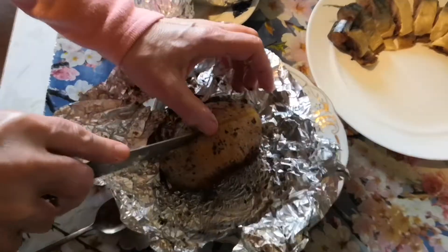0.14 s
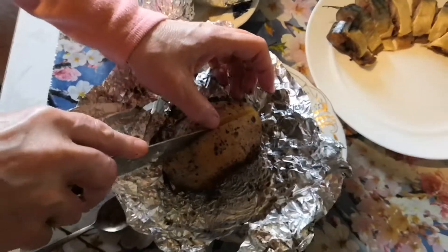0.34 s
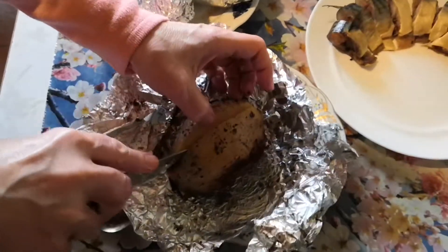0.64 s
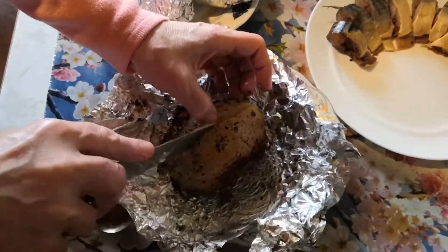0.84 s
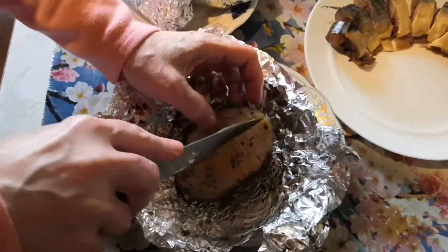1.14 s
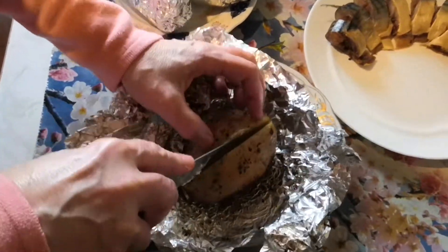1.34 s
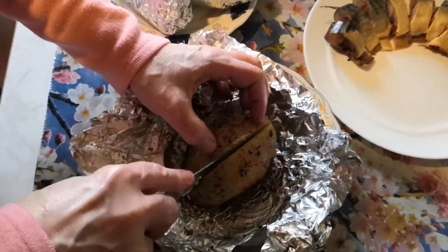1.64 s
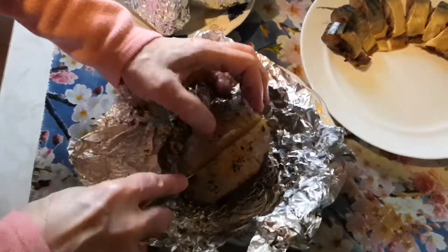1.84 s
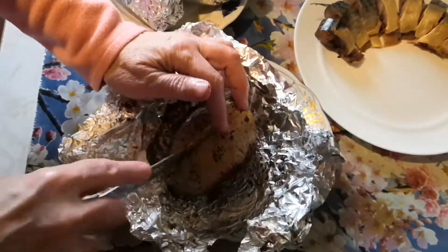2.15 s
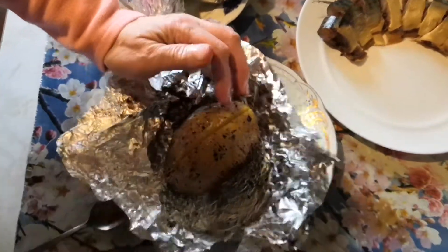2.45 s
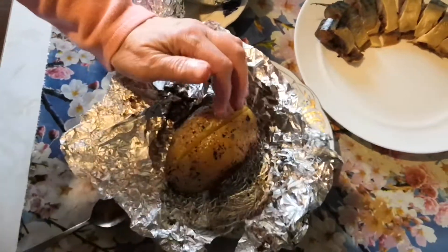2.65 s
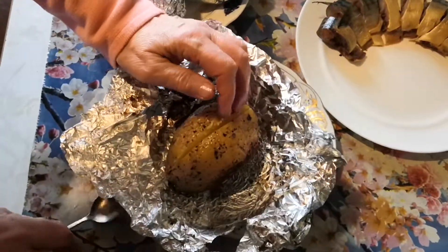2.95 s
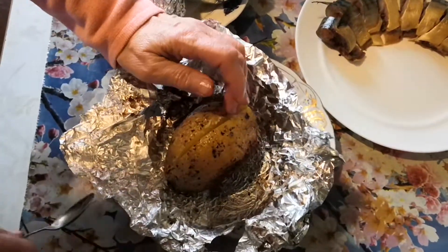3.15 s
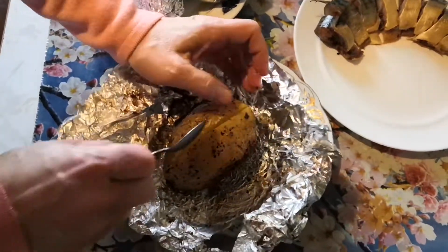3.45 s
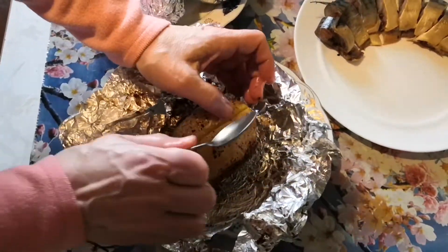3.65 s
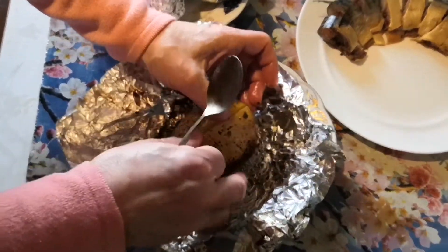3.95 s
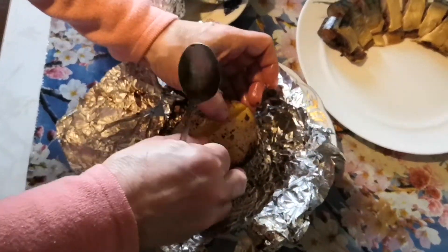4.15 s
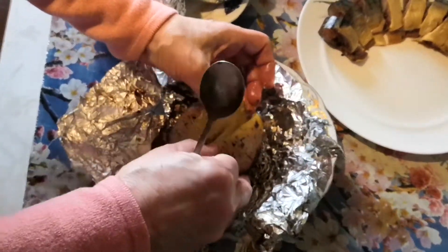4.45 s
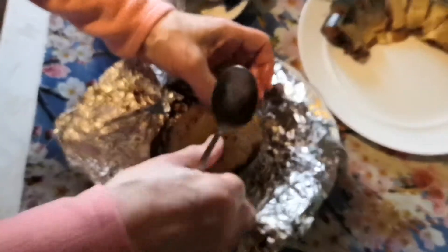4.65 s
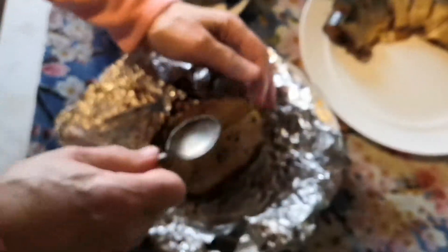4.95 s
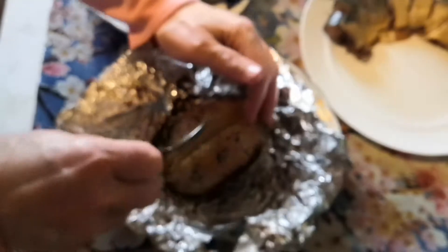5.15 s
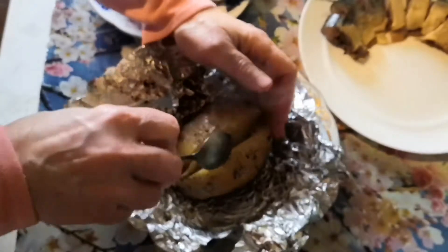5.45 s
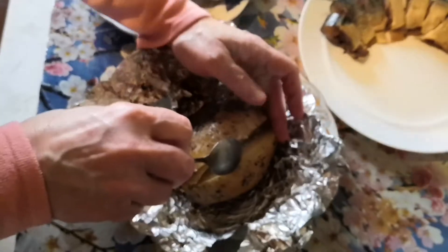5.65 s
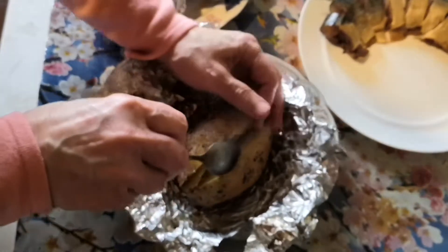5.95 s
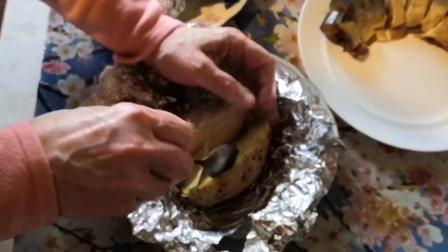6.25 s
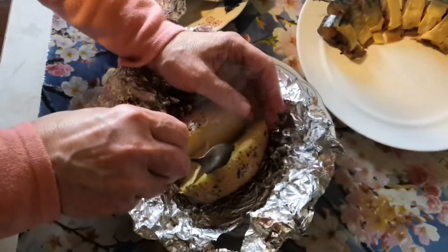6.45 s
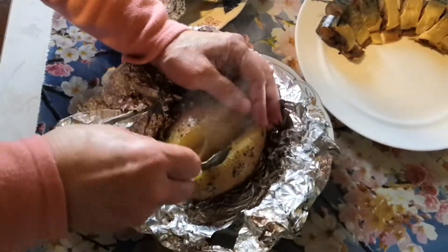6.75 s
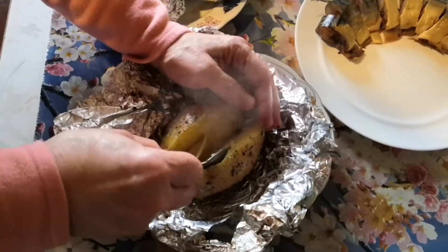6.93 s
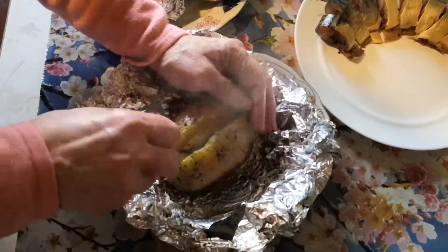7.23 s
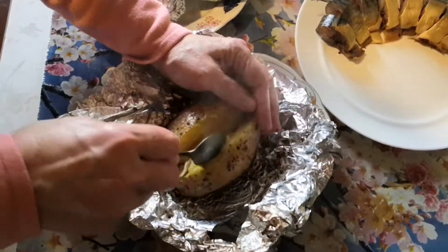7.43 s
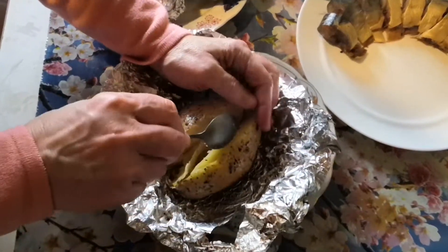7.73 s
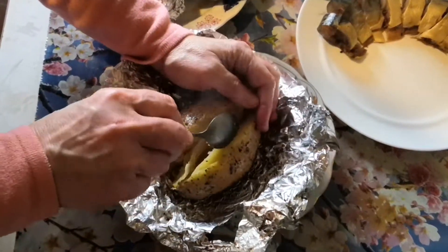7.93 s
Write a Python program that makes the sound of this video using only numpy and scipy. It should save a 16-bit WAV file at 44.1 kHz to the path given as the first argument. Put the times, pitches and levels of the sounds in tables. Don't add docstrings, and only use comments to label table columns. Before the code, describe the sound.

Close, crisp foil rustling with bright ticks and small tinny pops, interrupted by one loud cutlery clatter, over a faint low fridge hum.

```python
import sys
import numpy as np
from scipy import signal
from scipy.fft import rfft, irfft, next_fast_len
from scipy.io import wavfile
from scipy.ndimage import uniform_filter1d, minimum_filter1d, map_coordinates

SR = 44100
rng = np.random.default_rng(int(sys.argv[2]) if len(sys.argv) > 2 else 0)


def decibels_to_gain(level_db):
    exponent = np.asarray(level_db, float) / 20
    return 10 ** exponent


def log_audio(samples):
    frames = np.atleast_2d(samples).T
    limited = np.clip(frames, -1, 1)
    pcm = np.round(limited * 32767).astype(np.int16)
    wavfile.write(sys.argv[1], SR, pcm)


N = 356769

# pitch_hz [Hz], level_db [dB per Hz]
CREASE_COLOUR = [(1760, -17), (3000, -6.5), (4170, -5.5), (4700, -3.5), (6530, -5.5), (7720, -6),
                 (14500, -29), (15400, -23.5), (16000, -68)]


def unit(x):
    return x / np.sqrt(np.mean(x ** 2) + 1e-20)


def along(points, hz):
    f, v = np.transpose(points)
    return np.interp(np.log(hz + 1), np.log(f + 1), v)


def wobble(rate):
    knots = rng.standard_normal(int(N * rate / SR) + 4)
    return map_coordinates(knots, [np.arange(N) * rate / SR])


def filtered(x, response):
    m = next_fast_len(N + SR // 2)
    return irfft(rfft(x, m) * response(np.fft.rfftfreq(m, 1 / SR)), m)[..., :N]


def resonances(modes):
    def response(f):
        total = 0
        for k, (hz, width, db) in enumerate(modes):
            total = total + (-1) ** k * decibels_to_gain(db) * 1j * f * width / (hz * hz - f * f + 1j * f * width)
        return total
    return response


def laid_out(s, shapes):
    at = (np.round(s * SR).astype(int)[:, None] + np.arange(shapes.shape[2])).ravel()
    return np.array([np.bincount(at, side.ravel(), N + SR)[:N] for side in shapes])


def clangs(s, db, hz, width_hz, rise, t60, alike, size):
    port_lag_s = .00011
    t = np.arange(size) / SR
    step = t * width_hz
    whole, part = step.astype(int), step % 1
    draw = rng.standard_normal((len(s), 4, int(size / SR * 4000) + 2))
    shared = draw[:, 0] + 1j * draw[:, 1]
    own = draw[:, 2] + 1j * draw[:, 3]
    shared[:, 0] *= 2 / np.abs(shared[:, 0])
    late = shared * np.exp(-2j * np.pi * hz[:, None] * port_lag_s)
    knots = np.array([shared, alike * late + np.sqrt(1 - alike ** 2) * own])
    wander = knots[..., whole] * (1 - part) + knots[..., whole + 1] * part
    envelope = decibels_to_gain(-60 * (t / t60) ** 1.42) * (1 - np.exp(-t / rise))
    ring = (wander * np.exp(2j * np.pi * hz[:, None] * t)).real * envelope
    left_peak = np.abs(ring[0]).max(1)[:, None]
    return laid_out(s, decibels_to_gain(db)[:, None] * ring / left_peak)


def ticks(s, db, t60, size, rise=.0003):
    t = np.arange(size) / SR
    burst = np.moveaxis(rng.standard_normal((len(s), 2, size)), 1, 0)
    return laid_out(s, decibels_to_gain(db)[:, None] * burst * decibels_to_gain(-60 * t / t60) * (1 - np.exp(-t / rise)))


def still_air():
    # pitch_hz [Hz], level_db [dB per Hz]
    air = [(12, -39), (20, -7), (56, -3), (96, -6.5), (150, 4.5), (193, -4), (248, -1), (660, -21.5),
           (923, -17.5), (1370, -23), (1710, -8.5), (2460, -32), (3340, -38), (7730, -45), (14700, -58),
           (16000, -65)]
    # pitch_hz [Hz], likeness [0 to 1]
    likeness = [(60, 0.88), (950, .06)]

    def mid_and_side(hz):
        turn = np.arccos(np.clip(along(likeness, hz), -1, 1)) / 2
        return decibels_to_gain(along(air, hz)) * [np.cos(turn), np.sin(turn)]
    mid, side = filtered(rng.standard_normal((2, N)), mid_and_side)
    return decibels_to_gain(-61.5) * unit(np.array([mid + side, mid - side]))


def fridge():
    # pitch_hz [Hz], level_db [dB rms]
    lines = [
        (49, -66),
        (195.8, -65),
        (393.0, -80),
    ]
    t = np.arange(N) / SR
    hum = np.zeros(N)
    for hz, db in lines:
        level = np.sqrt(2) * decibels_to_gain(db + 1.2 * wobble(11))
        hum += level * np.sin(2 * np.pi * hz * t + .5 * wobble(3.4))
    return hum


def kitchen(x):
    # pitch_hz [Hz], t60_s [s]
    decay = [(200, 0.94), (2000, 0.18), (10000, 0.13)]
    hz, t, z = signal.stft(rng.standard_normal((2, SR // 2)), SR, nperseg=256)
    tail = signal.istft(z * decibels_to_gain(-60 * t / along(decay, hz)[:, None]), SR, nperseg=256)[1]
    delayed = np.pad(x.mean(0), (200, 0))[None]
    return signal.fftconvolve(delayed, tail / np.linalg.norm(tail[0]), axes=1)[:, :N]


def table_thumps():
    # start_s [s], level_db [dB peak], pitch_hz [Hz], t60_s [s]
    thumps = [
        (1.74, -39.5, 66.5, 0.4),
        (1.792, -38, 71.4, 0.17),
        (2.538, -37.5, 126.5, 0.27),
        (2.578, -37, 106, 0.24),
        (2.706, -28.5, 74.5, 0.084),
        (2.718, -34.5, 133.2, 0.52),
        (2.889, -33.5, 157, 0.065),
        (4.347, -40, 119, 0.25),
        (6.118, -46.5, 147.4, 0.34),
        (7.289, -56, 148.7, 0.88),
    ]
    t = np.arange(SR // 2) / SR
    s, db, hz, t60 = np.transpose(thumps)[..., None]
    boom = np.sin(2 * np.pi * hz * t)
    boom = boom + 0.14 * np.sin(2 * np.pi * 2.5 * hz * t) + 0.72 * np.sin(2 * np.pi * 0.65 * hz * t)
    boom = decibels_to_gain(db - 60 * t / t60) * (1 - np.exp(-t / 0.00494)) * boom
    return filtered(laid_out(s[:, 0], np.array([boom, boom])), lambda f: (1j * f / (45 + 1j * f)) ** 2)


def knife_landing():
    # start_s [s], level_db [dB peak]
    landings = [
        (2.535, -16.5),
        (2.578, -13),
        (2.7049, -1),
        (2.71, -10),
        (2.7161, 5),
        (2.7205, -3),
        (2.728, -15.5),
    ]
    # pitch_hz [Hz], width_hz [Hz], level_db [dB]
    table_modes = [(259, 31, -9.5), (355, 15, -11.5), (404, 25, -8.5), (730, 350, -15.5), (860, 120, -8.5),
                   (1236, 150, -5.5), (1604, 490, -6.5), (2000, 170, -1), (2280, 210, -3.5),
                   (2690, 140, 1.5), (4170, 220, -13), (5940, 500, -10.5), (7540, 1300, -16)]
    s, db = np.transpose(landings)
    chatter_s = np.array([0, .0015, .0025])
    times = (s[:, None] + chatter_s).ravel()
    rattle = ticks(times, np.repeat(db + 14.0, len(chatter_s)), t60=0.0081, size=1000, rise=0.0013)
    wood = resonances(table_modes)
    return filtered(rattle, lambda f: wood(f) / (1 + 1j * f / 6000) ** 4)


def spoon():
    # pitch_hz [Hz], width_hz [Hz], level_db [dB]
    spoon_modes = [
        (910, 96, -7.5),
        (1780, 97.7, -5),
        (2450, 130, 1),
        (2760, 146, 6.5),
        (4250, 346, -5),
    ]
    # start_s [s], level_db [dB]
    drag = [
        (2.955, -57),
        (2.968, -46),
        (3.012, -40),
        (3.026, -51),
        (3.055, -46.5),
        (3.085, -69),
    ]
    # start_s [s], level_db [dB]
    lift = [
        (3.03, -65),
        (3.06, -49.5),
        (3.105, -90),
    ]
    # start_s [s], level_db [dB peak]
    catches = [
        (2.9642, -39.5),
        (2.9785, -30),
        (2.9895, -32),
        (2.9996, -24),
        (3.0075, -35),
        (3.039, -33),
        (3.0493, -44),
        (3.0554, -32),
    ]
    s, db = np.transpose(catches)
    sound = filtered(ticks(s, db + 21, t60=0.0066, size=600, rise=0.00044), resonances(spoon_modes))
    for stroke, modes in ((drag, spoon_modes), (lift, [(1200, 98, 0)])):
        knots, db = np.transpose(stroke)
        slips = rng.standard_normal((2, N)) * decibels_to_gain(1.5 * wobble(130))
        level = decibels_to_gain(np.interp(np.arange(N) / SR, knots, db + 5.0, left=-120, right=-120))
        sound = sound + level * unit(filtered(slips, resonances(modes)))
    return sound


def rubs():
    # start_s [s], length_s [s], level_db [dB], pitch_hz [Hz],
    # width_hz [Hz]
    slides = [(0.152, 0.071, -58, 2800, 120), (1.925, 0.14, -63, 3580, 110), (2.974, 0.057, -42.5, 952, 90),
              (3.213, 0.23, -58, 2650, 327), (3.314, 0.11, -49.5, 7450, 900),
              (3.424, 0.031, -42.5, 1555, 220), (3.51, 0.031, -46, 2000, 150),
              (3.616, 0.094, -54, 1710, 100), (7.308, 0.054, -66, 665, 100), (6.458, 0.085, -61, 1040, 500),
              (5.089, 0.021, -39, 2516, 74), (7.866, 0.11, -58, 5700, 640), (3.137, .014, -49, 1800, 150),
              (3.138, .016, -48.5, 2360, 150), (3.166, 0.024, -46, 2410, 150),
              (3.164, 0.023, -48.5, 1725, 150), (5.849, .11, -58, 2700, 130), (5.895, 0.15, -50, 1773, 115),
              (6.04, 0.098, -47, 2450, 200), (6.085, 0.15, -48.5, 1728, 120), (6.199, 0.12, -57, 1685, 170),
              (6.197, 0.088, -63, 2350, 150), (6.356, 0.11, -61.5, 1625, 130)]
    sound = np.zeros((2, N))
    for s, length, db, hz, width in slides:
        size, start = int(length * SR), int(s * SR)
        f = np.fft.rfftfreq(size, 1 / SR)
        friction = rng.standard_normal((2, size))
        tone = irfft(rfft(friction) * resonances([(hz, width, 0)])(f) ** 2, size)
        sound[:, start:start + size] += decibels_to_gain(db) * unit(tone) * np.sqrt(np.hanning(size))
    return sound


def pressure():
    # start_s
    # [s, at the peak], level_db [dB], bright_db [dB], swell_s and fade_s [s per 20 dB]
    hand_presses = [(.054, -45.5, -1, 0.2, 0.058), (.12, -57, 2, 0.046, 0.42),
                    (.34, -54, -16.5, 0.11, 0.084), (.521, -41.5, -7.5, 0.083, 0.056),
                    (.633, -53, -8, 0.089, 0.16), (.798, -55, -12, 0.074, 0.066),
                    (.972, -49.5, -7.5, 0.1, 0.12), (1.145, -58.5, -9, 0.15, 0.055),
                    (1.307, -51.5, -5.5, 0.15, 0.33), (1.527, -40, -6.5, 0.074, 0.03),
                    (1.69, -58.5, -2, 0.25, 0.23), (1.757, -34.5, -4, 0.034, 0.047),
                    (1.892, -37.5, -4.5, 0.19, 0.059), (2.095, -51.5, -7, 0.018, 1),
                    (2.35, -45, -7.5, 0.51, 0.013), (2.406, -43.5, -0.5, .005, 0.1),
                    (2.584, -36.5, -16, 0.023, 0.23), (2.68, -56.5, 7.5, 0.12, 0.077),
                    (2.722, -28, -29, 0.018, 0.11), (3.049, -49.5, -4, 0.33, 0.029),
                    (3.149, -62, 2.5, 0.016, 0.05), (3.225, -70, 13, .008, 0.28),
                    (3.42, -53.5, 3.5, 0.15, 0.21), (3.593, -41, -6, 0.12, 0.04),
                    (3.66, -61, -20, 0.074, 0.48), (3.737, -43, -2, 0.032, 0.053),
                    (3.841, -43, -3.5, 0.091, 0.06), (3.936, -50, -9, 0.088, 0.03),
                    (4.079, -61, 0, 0.13, 0.037), (4.18, -59, -9, 0.092, 0.2), (4.364, -47, -8, 0.14, 0.11),
                    (4.524, -44.5, -6, 0.095, 0.024), (4.648, -50, -3.5, 0.12, 0.083),
                    (4.85, -47, -5, 0.05, 0.13), (5.005, -51, 1.5, 0.19, 0.063),
                   (5.096, -44, -4, 0.017, 0.057), (5.226, -57, -5, 0.11, 0.11),
                   (5.48, -49, -5, 0.047, 0.15), (5.585, -47.5, -2, 0.18, 0.018),
                   (5.645, -52, -4, 0.11, 0.025), (5.876, -44.5, -5.5, 0.22, 0.031),
                   (6.172, -44.5, -6, 0.32, 0.033), (6.381, -63.5, -6, 1, 0.98),
                   (6.607, -57.5, -12, 0.038, 0.14), (6.735, -55.5, -4.5, 0.061, 0.12),
                   (6.893, -52.5, -3.5, 0.13, 0.18), (7.11, -69, 6, 0.35, 0.55),
                   (7.201, -41.5, -10.5, 0.028, 0.041), (7.274, -53.5, -1.5, 0.02, 0.1),
                   (7.403, -54.5, -7.5, 0.094, 0.19), (7.635, -63.5, -2, 0.72, 0.13),
                   (7.828, -62, -6.5, 0.27, 0.059), (7.888, -59, 1.5, 0.051, 0.59),
                   (8.06, -57, -14, 0.2, 0.25)]
    s, db, bright_db, swell, fade = np.array(hand_presses).T[..., None]
    t = np.arange(0, N / SR, .001)
    db = db - 20 * np.maximum((s - t) / np.abs(swell), (t - s) / np.abs(fade))
    levels = []
    for each_db in (db, db + bright_db):
        levels.append(np.interp(np.arange(N) / SR, t, np.linalg.norm(decibels_to_gain(each_db), axis=0)))
    return levels


def crowd(rate, scatter_db, clump_db):
    draw = rng.random((int(N / SR * rate), 2))
    s = draw[:, 0] * N / SR
    size_db = np.minimum(-scatter_db * np.log(draw[:, 1]), 14)
    return s, size_db + clump_db * wobble(70)[(s * SR).astype(int)]


def patchy(x, patchy_db):
    z = signal.stft(x, nperseg=256)[2]
    field = uniform_filter1d(rng.standard_normal(z.shape[1:]), 6, 0)
    field = uniform_filter1d(field, 24, 1)
    return signal.istft(z * decibels_to_gain(patchy_db * unit(field)), nperseg=256)[1][:, :N]


def rustle():
    # start_s [s], pitch_hz [Hz]
    grip = [
        (0, 2080),
        (8.09, 2187),
    ]
    # pitch_hz [Hz], level_db [dB per Hz]
    panel_colour = [(350, -81.5), (600, -71), (1020, -6.5), (1320, -9), (1650, -2), (1880, -0.5),
                    (2100, -9), (3570, -9), (5000, -20.5), (6500, -25.5), (11000, -120)]
    dull, bright = pressure()
    s, db = crowd(900, scatter_db=3.5, clump_db=2)
    capped_db = np.minimum(db, 10)
    scatter = rng.standard_normal((len(s), 2))

    hz = np.interp(s, *np.transpose(grip)) * np.exp(.18 * scatter[:, 0])
    body = clangs(s, capped_db, hz, width_hz=500, rise=0.00026, t60=0.016, alike=0.66, size=280)
    body = filtered(unit(body), lambda f: 1 / (1 + (1200 / (f + 1)) ** 4))
    hush = filtered(rng.standard_normal((2, N)), lambda f: decibels_to_gain(along(panel_colour, f)))
    body = unit(body + 0.5 * unit(hush))

    flex_hz = 950 * np.exp(0.071 * scatter[::6, 1])
    flex = unit(clangs(s[::6], db[::6], flex_hz, width_hz=130, rise=.002, t60=0.015, alike=0.13, size=700))

    fizz = unit(ticks(s, capped_db + 2 * scatter[:, 1], t60=.005, size=200))
    fizz = patchy(fizz + .5 * rng.standard_normal((2, N)), patchy_db=2.5)
    fizz = unit(filtered(fizz, lambda f: decibels_to_gain(along(CREASE_COLOUR, f))))
    return dull * (decibels_to_gain(3.0) * body + decibels_to_gain(-19.0) * flex) + decibels_to_gain(2.5) * bright * fizz


def panel_snaps():
    # start_s [s], level_db [dB, clang peak], pitch_hz [Hz], tick_db [dB]
    crease_snaps = [(.0509, -24, 1500, -56), (.3346, -32.5, 1930, -50), (.4903, -32, 1900, -62),
                    (.6275, -31.5, 1860, -80), (.6923, -32.5, 2000, -63), (.841, -32.5, 1620, -56.5),
                    (.8904, -24.5, 3980, -75), (.913, -34, 1940, -59), (.9304, -27.5, 2450, -46.5),
                    (1.1643, -41, 2130, -57), (1.2431, -26.5, 2240, -72), (1.281, -38, 7560, -39),
                    (1.302, -26, 2430, -39), (1.31, -36, 2000, -37), (1.3155, -40, 7300, -45),
                    (1.3594, -27, 2600, -39.5), (1.4294, -28.5, 1590, -72), (1.486, -21, 2500, -35.5),
                    (1.5235, -31, 2650, -35.5), (1.5993, -32.5, 2200, -44), (1.737, -18.5, 1160, -31.5),
                    (1.7414, -17, 1970, -28), (1.7521, -16, 1850, -27), (1.7905, -17.5, 1660, -34),
                    (1.925, -20.5, 2000, -29), (2.0819, -22, 1795, -29), (2.2046, -29, 1790, -42),
                    (2.2244, -23, 1910, -38), (2.2902, -22, 1690, -35.5), (2.3497, -29, 1600, -57),
                    (2.404, -25, 4070, -51),
                    (2.5435, -27, 2120, -47), (2.5815, -16, 1520, -53), (2.598, -16, 4400, -52),
                  (2.615, -17, 4530, -42), (2.623, -17.5, 4300, -39), (2.631, -19.5, 4430, -39),
                  (2.6458, -20.5, 1670, -27), (3.2246, -44, 2570, -49), (3.5073, -27, 2210, -42),
                  (3.5443, -23.5, 2100, -33.5), (3.5575, -22, 2360, -60), (3.578, -17.5, 2220, -51),
                  (3.72, -29, 2380, -67), (3.802, -26, 2080, -53), (4.281, -33.5, 2050, -51),
                  (4.347, -29, 1910, -67), (4.359, -31, 7900, -41), (4.458, -31.5, 2450, -38),
                  (4.5057, -36, 2580, -60), (4.9345, -28, 5300, -41), (5.007, -21, 2410, -61),
                  (5.091, -40, 2550, -40), (5.106, -29, 2330, -39), (5.23, -49, 8000, -41),
                    (5.475, -34.5, 2280, -39), (5.5, -29, 2440, -40), (5.537, -29, 2380, -41),
                 (5.5706, -22, 2380, -39), (5.585, -29, 2280, -34), (5.6991, -24.5, 2410, -43),
                 (5.7976, -18.5, 1960, -38), (5.838, -23, 2460, -44), (5.8605, -24.5, 1700, -48),
                 (6.7078, -37.5, 2640, -62), (6.7271, -33, 2040, -66.5), (6.815, -29.5, 2630, -39),
                 (6.897, -31, 2420, -44), (6.952, -32.5, 3050, -41.5), (7.0179, -33, 7700, -42),
                 (7.123, -35.5, 2320, -42), (7.1447, -42, 1840, -42.5), (7.1774, -32, 2200, -45),
                 (7.2004, -37, 2400, -63), (7.2668, -33, 7360, -40), (7.3683, -36, 6600, -48),
                 (7.4327, -32, 1810, -52), (7.524, -34, 2430, -66), (7.634, -34.5, 2010, -68),
                 (7.9141, -42.5, 2700, -38), (7.9784, -27.5, 1900, -42), (8.039, -25, 3810, -39)]
    # start_s [s], level_db [dB peak], pitch_hz
    # [Hz]
    inner_snaps = [(0.0244, -42, 2000), (0.5043, -18, 2000), (0.5284, -23, 2400), (0.5646, -31, 1950),
                   (0.9542, -35, 2080), (1.3433, -36, 2190), (1.3857, -30, 1730), (1.4686, -39, 2530),
                   (1.722, -23, 1830), (1.8347, -34, 1680), (1.8657, -18, 2130), (1.8886, -25, 2030),
                   (2.0368, -40, 2000), (2.2478, -24, 1780), (2.4608, -29, 2340), (2.5795, -35, 1730),
                   (3.1604, -33.5, 2270), (3.468, -28.5, 2640), (3.5144, -29, 1990), (3.5299, -20, 2090),
                   (3.5844, -21, 2090), (3.7364, -30, 2060), (3.8484, -39, 1970), (4.5144, -20, 2690),
                   (4.9686, -25, 2240), (6.1294, -38, 1640), (7.8314, -31.5, 2840), (8.0396, -21, 2530),
                   (2.5797, -15, 2500),
        (2.953, -27, 2270),
        (4.4718, -28, 2230),
        (6.744, -29, 2200),
        (6.888, -24, 2330),
        (7.0185, -35, 2530),
        (7.203, -24.5, 2180),
        (7.267, -30, 2330),
    ]
    s, db, hz, tick_db = np.array(crease_snaps).T
    clang = clangs(s, db - 4.0, hz, width_hz=936, rise=0.000097, t60=0.017, alike=0.46, size=1200)
    inner = clangs(*np.array(inner_snaps).T,
                   width_hz=800, rise=0.0002, t60=0.024, alike=0.6, size=1200)
    clang = clang + decibels_to_gain(-9.0) * inner
    clang = filtered(clang, lambda f: (1j * f / (700 + 1j * f)) ** 2)
    edge = filtered(ticks(s, tick_db + 14.5, t60=0.017, size=400),
                    lambda f: decibels_to_gain(along(CREASE_COLOUR, f)) / (1 + (4500 / (f + 1)) ** 4))
    return clang + edge


def tight_creases():
    # start_s [s], level_db [dB peak], pitch_hz [Hz]
    early_ticks = [(0.0253, -38, 5860), (0.5038, -47, 5020), (0.5302, -31, 7460), (0.892, -35, 3970),
                   (0.9303, -40, 7500), (1.2745, -45, 6510), (1.282, -41, 7700), (1.3024, -37, 4760),
                   (1.357, -31, 4730), (1.485, -42, 3760), (1.485, -49, 6470), (1.525, -49, 7560),
                   (1.601, -42, 5500), (1.6756, -43, 3920), (1.676, -33, 7800), (1.7414, -27, 6800),
                   (1.7417, -20, 6120), (1.7517, -11, 6420), (1.7903, -35, 5600), (1.8706, -25, 4500),
                   (1.9245, -29, 5900), (2.0667, -41, 6840), (2.081, -31, 5830), (2.2025, -41, 5900),
                   (2.2243, -40, 6200), (2.288, -38, 6260), (2.289, -27, 4470), (2.404, -34, 3570),
                   (2.5351, -36, 4800), (2.5805, -31, 3800), (2.5805, -21.5, 4280), (2.596, -22, 4240),
                   (2.6155, -19, 4560), (2.6449, -23, 5650), (2.7174, -14, 5920), (2.7172, -3.5, 4100),
                   (2.9682, -37, 4160), (2.9776, -26, 4250), (2.9991, -33.5, 4140), (3.2226, -49, 5420),
                   (3.5414, -39, 5700), (3.5746, -40, 4640), (3.6496, -35, 8100)]
    # start_s [s], level_db [dB peak]
    plain_ticks = [
        (.9037, -48),
        (1.0384, -43),
        (1.18, -43),
        (1.3144, -34.5),
        (1.9727, -42),
        (2.2137, -27),
        (2.4668, -33),
        (2.574, -42),
        (2.7003, -40),
                   (3.7088, -48), (3.7253, -36), (3.7345, -33), (3.7357, -29), (3.821, -40), (3.8674, -43),
                  (3.9338, -42), (4.0336, -48), (4.1962, -46), (4.2695, -43), (4.3526, -41), (4.3583, -39),
                  (4.359, -31), (4.3765, -30.5), (4.4583, -36.5), (4.8464, -47), (4.932, -41), (5.075, -39),
                  (5.093, -31), (5.107, -35), (5.214, -38), (5.2296, -30), (5.4727, -38), (5.4737, -30),
                  (5.5006, -41), (5.5521, -36), (5.5731, -32), (5.6984, -41), (5.7971, -40), (5.84, -42),
                  (5.8599, -47), (6.0161, -52), (6.053, -43), (6.064, -39), (6.087, -33), (6.6626, -39),
                  (6.8018, -51), (6.8152, -44), (6.8811, -41), (6.8962, -35.5), (6.9295, -39),
                  (6.9509, -34.5), (7.0186, -40), (7.1046, -37), (7.1201, -43), (7.148, -39), (7.1773, -40),
                  (7.2672, -41), (7.2672, -33), (7.3001, -35), (7.368, -39.5), (7.3896, -32.5),
                  (7.4027, -41), (7.4937, -45), (7.618, -48), (7.7352, -44), (7.9144, -36), (7.975, -37),
                  (8.023, -47), (8.0382, -35)]
    pitched = clangs(*np.transpose(early_ticks), width_hz=2700, rise=0.00013, t60=0.011, alike=0.22, size=700)
    s, db = np.array(plain_ticks).T
    fold = resonances([(7000, 5000, 0)])
    plain = filtered(ticks(s, db + 7.5, t60=0.0069, size=300), lambda f: fold(f) / (1 + (f / 11000) ** 4))
    return decibels_to_gain(-2.5) * pitched + plain


def foil():
    return rustle() + panel_snaps() + tight_creases()


def scene():
    sheet = (foil() + rubs() + spoon() * decibels_to_gain([[-3], [3]])) * decibels_to_gain([[-1], [1]])
    knife = knife_landing() * decibels_to_gain([[-1.5], [1.5]])
    room = decibels_to_gain(-15) * kitchen(sheet)
    echo = decibels_to_gain(-5.0) * filtered(kitchen(knife), lambda hz: hz / np.hypot(hz, 900))
    return sheet + knife + table_thumps() + room + echo + still_air() + fridge()


def limited(x):
    need = np.minimum(1, .9 / (np.abs(x).max(0) + 1e-9))
    return x * uniform_filter1d(minimum_filter1d(need, size=201), size=100)


def band_limit(x):
    return signal.sosfilt(signal.butter(12, 16470, fs=SR, output="sos"), x)


def record(dry):
    # pitch_hz [Hz], level_db [dB]
    facing = [(60, 0.0), (380, 0.5), (950, 1.0), (2380, 4.5), (5980, 8.5), (15000, 7.5)]
    mid, side = (dry[0] + dry[1]) / 2, (dry[0] - dry[1]) / 2
    side = filtered(side, lambda hz: hz / np.hypot(hz, 300))

    def shade(hz):
        return decibels_to_gain(np.outer([.5, -.5], along(facing, hz))) * (hz < 16400)
    ports = filtered(np.array([mid + side, mid - side]), shade)
    return band_limit(limited(ports))


dry = scene()
out = record(dry)
log_audio(out)
```